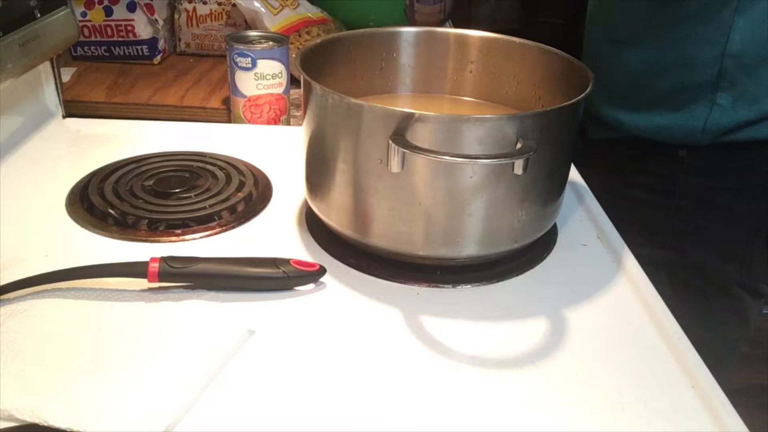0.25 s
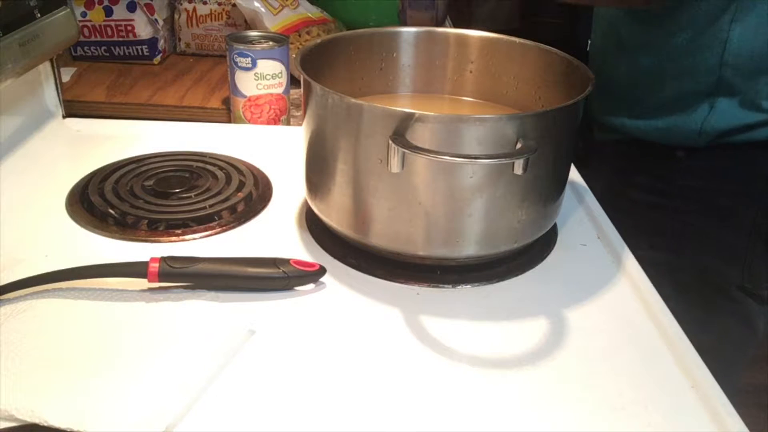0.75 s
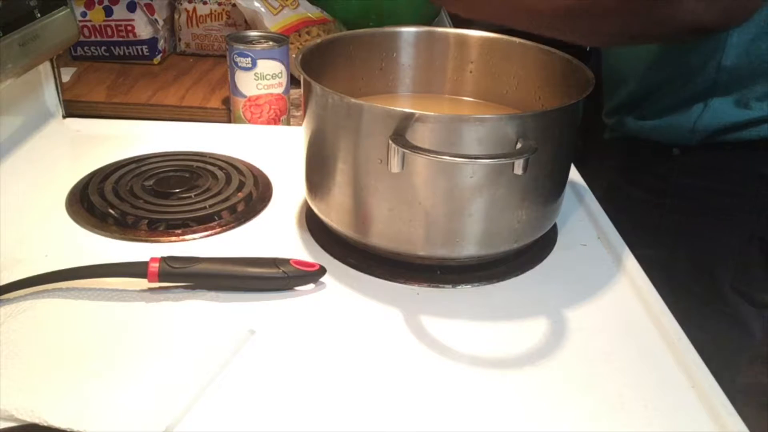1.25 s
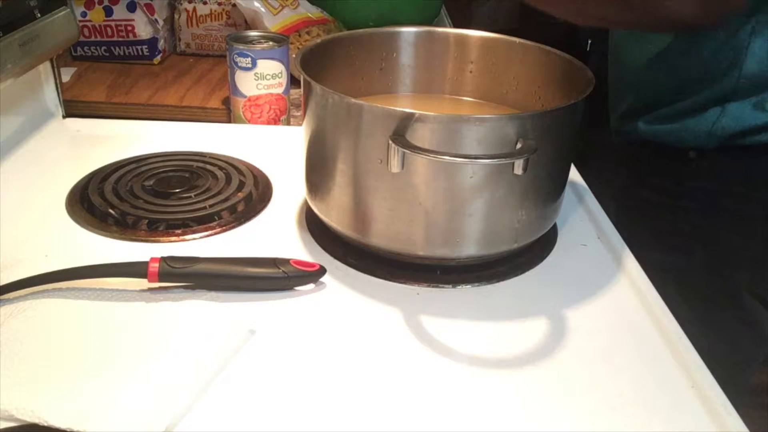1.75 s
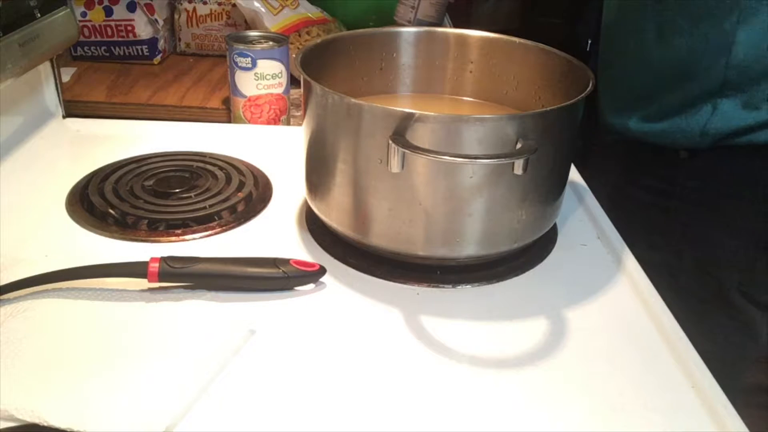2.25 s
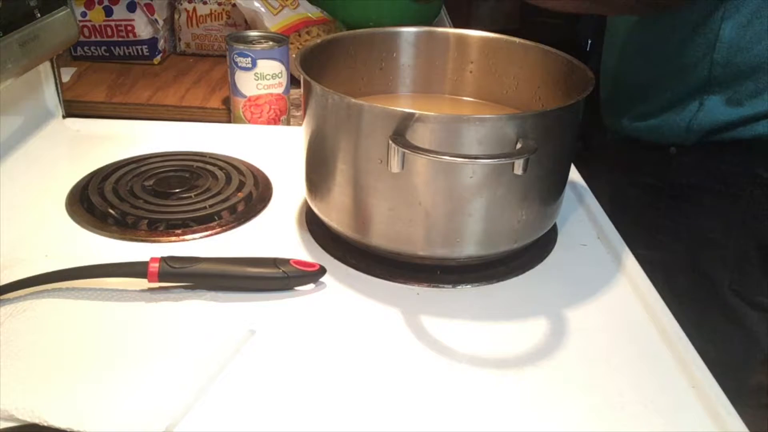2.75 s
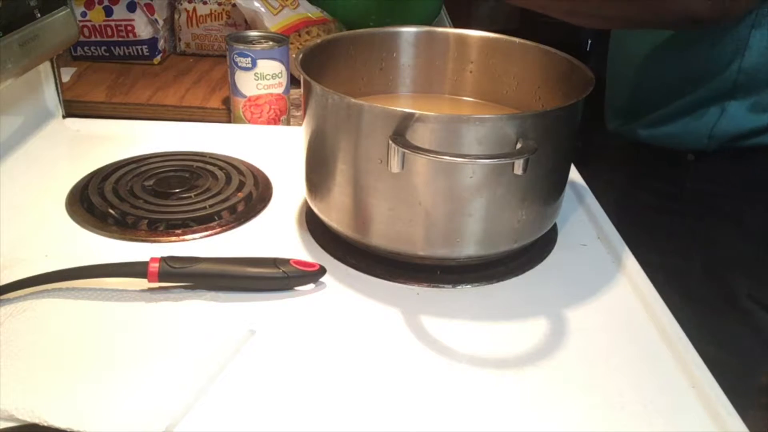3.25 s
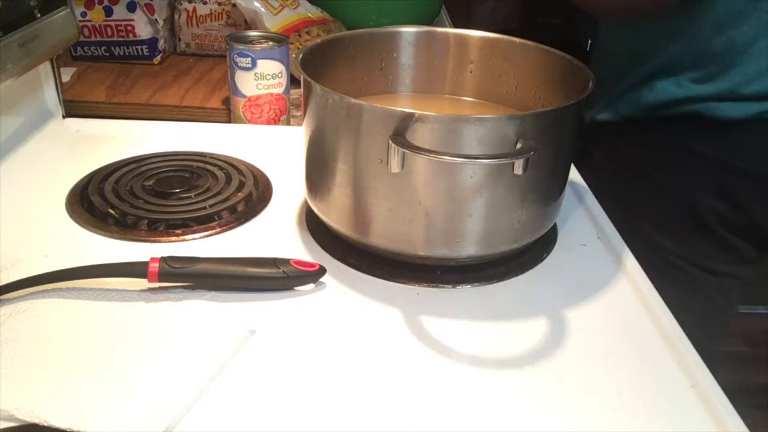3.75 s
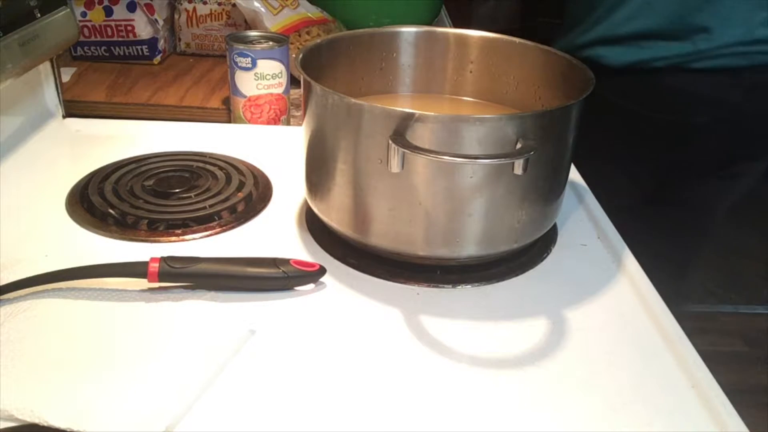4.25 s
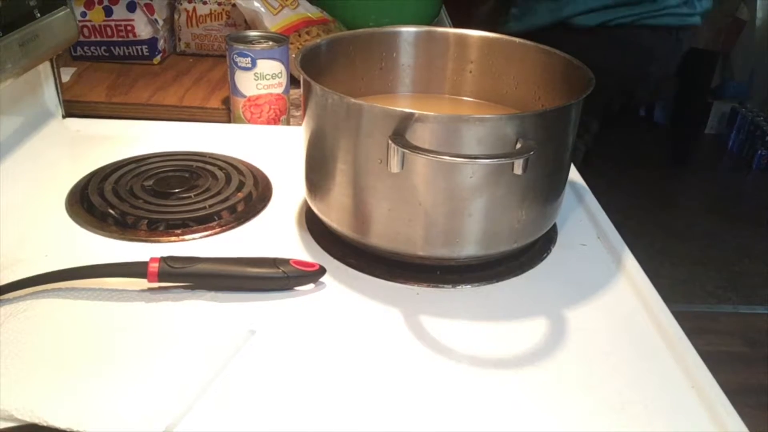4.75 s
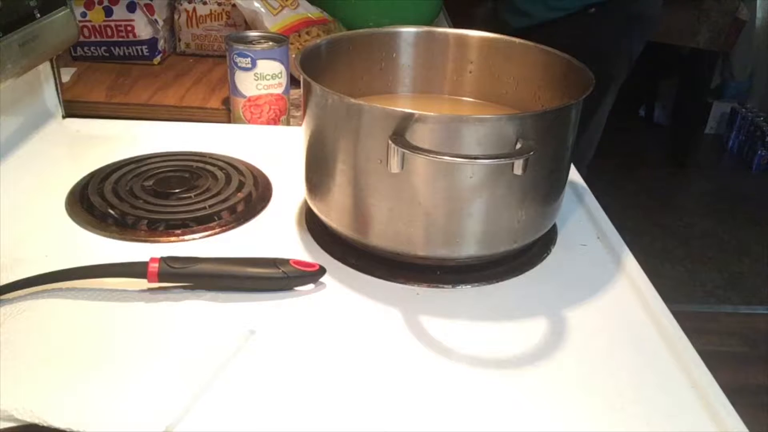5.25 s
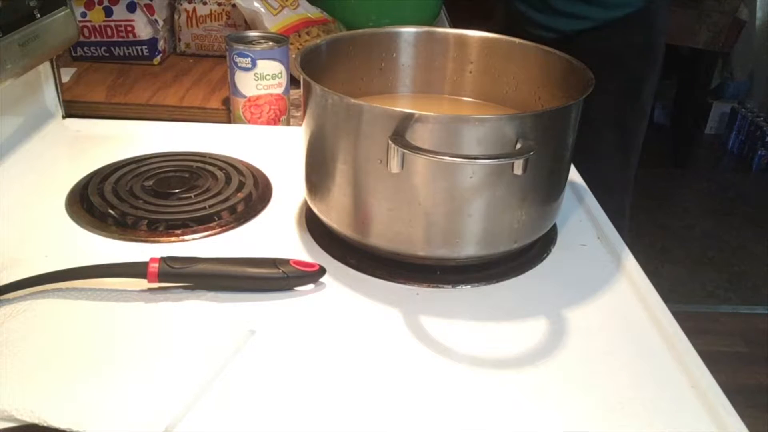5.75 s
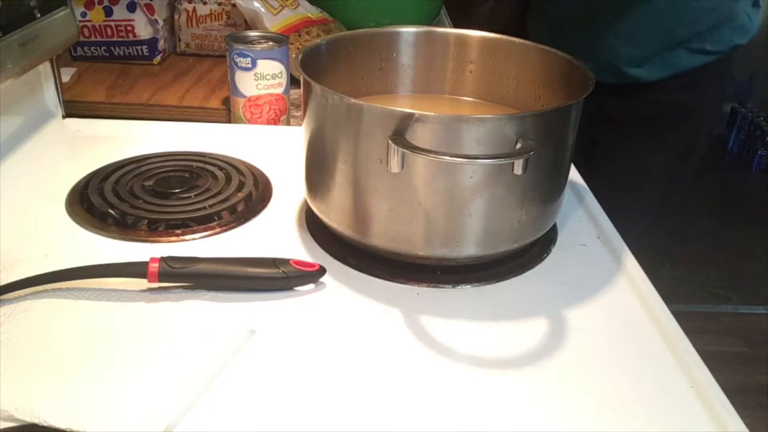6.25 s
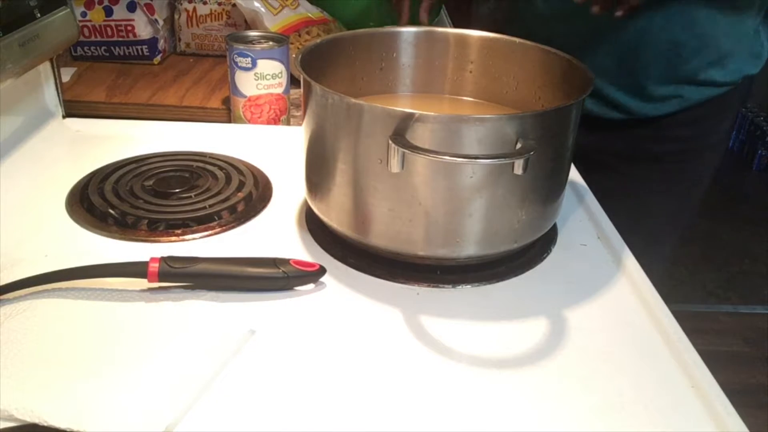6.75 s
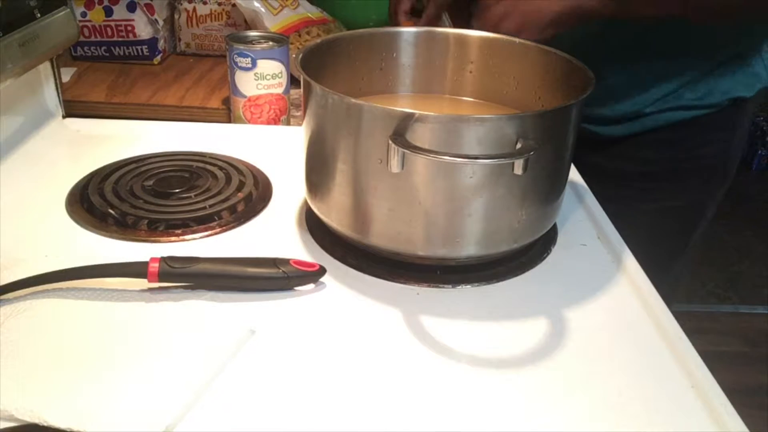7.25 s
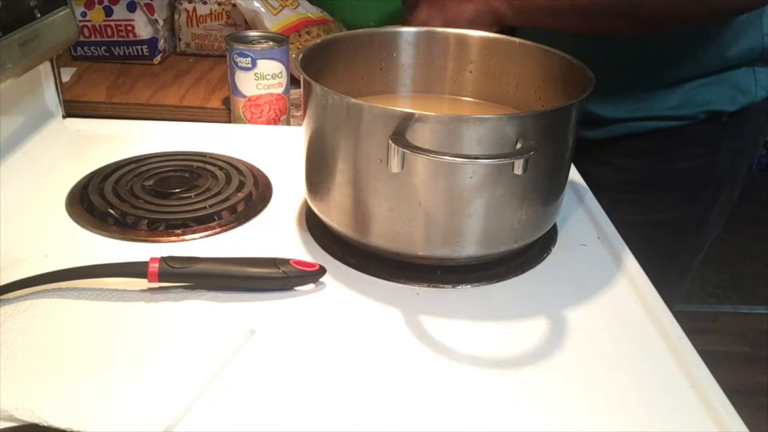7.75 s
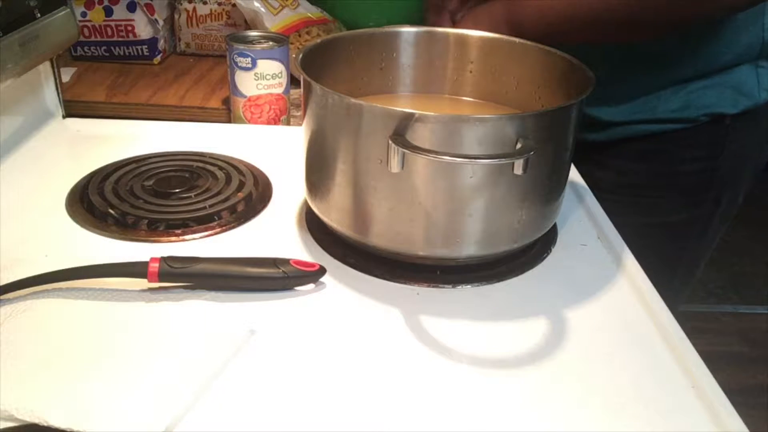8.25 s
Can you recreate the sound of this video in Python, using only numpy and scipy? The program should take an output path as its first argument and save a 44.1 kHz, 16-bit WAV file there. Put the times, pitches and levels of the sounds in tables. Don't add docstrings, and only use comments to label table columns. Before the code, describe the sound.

Quiet home kitchen with low room tone, faint refrigerator hum and tiny ticks from a warming stove. A can's rim snaps softly, then an opener thuds and clacks onto the counter. The loose lid drops with a bright ring and wobbles flat. A bin lid knocks, feet scuff, and the can crashes into the bin, rattling. Soft steps and a faint jingle follow. Single microphone near the stove, slight hard-walled reverberation.

```python
import sys
import numpy as np
from scipy import signal
from scipy.fft import rfft, irfft, next_fast_len
from scipy.io import wavfile
from scipy.ndimage import uniform_filter1d, map_coordinates

SR = 44100
rng = np.random.default_rng(int(sys.argv[2]) if len(sys.argv) > 2 else 0)


def wrap_up_sound(samples):
    columns = np.atleast_2d(samples).T
    tamed = np.clip(columns, -1, 1)
    steps = np.round(tamed * 32767).astype(np.int16)
    wavfile.write(sys.argv[1], SR, steps)


def undo_db(level):
    steps = np.asarray(level, float) / 20
    return 10 ** steps


N = 374850


def unit(x):
    return x / np.sqrt(np.mean(x ** 2) + 1e-20)


def along(points, hz):
    f, value = np.transpose(points)
    return np.interp(np.log(hz + 1), np.log(f + 1), value)


def wobble(rate):
    knots = rng.standard_normal(int(N * rate / SR) + 4)
    return map_coordinates(knots, [np.arange(N) * rate / SR])


def noise(tone, size, tilt_db=0):
    hz = np.fft.rfftfreq(size, 1 / SR)
    gain = undo_db(along(tone, hz) + tilt_db * np.log2(hz / 1000 + 0.26))
    return unit(irfft(rfft(rng.standard_normal(size)) * gain, size))


def fading(x, t60, patchy_db=0):
    hz, t, z = signal.stft(x, SR, nperseg=256)
    patches = unit(uniform_filter1d(rng.standard_normal(z.shape), size=8, axis=1))
    gain = undo_db(patchy_db * patches - 60 * t / t60(hz)[:, None])
    return signal.istft(z * gain, SR, nperseg=256)[1][:len(x)]


def swell(s, hold, db, rise_db_per_s, fall_db_per_s):
    t = np.arange(N) / SR - s
    return undo_db(db - rise_db_per_s * np.maximum(-t, 0) - fall_db_per_s * np.maximum(t - hold, 0))


def contacts(rows, own, **shared):
    full = []
    for row in rows:
        columns = dict(zip(["s", "peak_db"] + own.split(), row))
        full.append({"treble_db": 0, "free": 1, **shared, **columns})
    return [[c[key] for key in "s peak_db treble_db ring_db life free".split()] for c in full]


def phase_walk(count, size):
    walk = np.cumsum(rng.standard_normal((count, size // 64)), axis=1).repeat(64, axis=1)
    return uniform_filter1d(walk, size=128, axis=1)


def strike(hits, modes, tone, rise, rough, scatter_db=4.5, tilt=0.55, treble_loss=0.097, patchy_db=4, order=14):
    out, t = np.zeros(N + SR), np.arange(2 ** order) / SR
    hz, level_db, t60 = np.transpose(modes)[:, :, None]
    usual_db = np.mean(np.transpose(hits)[2])
    start = rng.uniform(0, 2 * np.pi, hz.shape)
    for s, peak_db, treble_db, ring_db, life, free in hits:
        tilt_db = tilt * (treble_db - usual_db)
        crack = fading(noise(tone, len(t), tilt_db), lambda f: life * (f / 1000 + 0.11) ** -treble_loss, patchy_db)
        rebounds = rng.standard_normal(len(t) // 128).repeat(128)
        crack *= undo_db(1.24 * uniform_filter1d(rebounds, size=128))
        size_db = level_db + tilt_db * np.log2(hz / 1000 + 0.15) + scatter_db * rng.standard_normal(hz.shape)
        shake = phase_walk(len(modes), len(t))
        phase = 2 * np.pi * hz * (t + round(s * SR) / SR) + start + rough * shake * np.sqrt(hz / 1000)
        decay = np.exp(-np.log(1000) * t / (free * t60))
        ring = np.sum(undo_db(size_db) * decay * np.sin(phase), axis=0)
        onset = (1 - np.exp(-(t / rise) ** 2)) * np.cos(np.pi / 2 * (t / t[-1]) ** 2)
        out[round(s * SR):][:len(t)] += undo_db(peak_db - 9.5) * onset * (crack + undo_db(ring_db) * ring)
    return out[:N]


# (frequency [Hz], density [dB per Hz])
ROOM_TONE = [(20, -19.5), (42, 2), (113, -9), (284, -17.5), (586, -21.5), (1150, -21.5), (1890, -26.5),
             (15800, -40.5)]
# (frequency [Hz], level [dB])
FRIDGE_TONES = [(839.8, -86), (1125, -80), (1244, -85.5)]


def air():
    t = np.arange(N) / SR
    hum = 0
    for hz, db in FRIDGE_TONES:
        level = undo_db(db + 4.0 + 3.1 * wobble(11.0))
        hum = hum + level * np.sin(2 * np.pi * hz * t + 0.39 * wobble(58))
    return undo_db(-62 + 0.25 * wobble(8.3)) * noise(ROOM_TONE, N) + hum


# (time [s], hold [s], level [dB])
FOOTSTEPS = [(0.068, 0.17, -59.5), (0.58, 0.0068, -45.5), (3.563, 0.0089, -42), (4.035, 0.14, -62.5),
             (4.429, 0.077, -42), (4.637, 0.019, -38), (5, 0.02, -52.5), (5.104, 0.11, -55.5),
             (5.272, 0.024, -59.5), (5.775, 0.044, -35), (5.91, 0.16, -41), (6.565, 0.03, -50.5),
             (6.847, 0.24, -58), (7.167, 0.068, -46), (7.4, 0.1, -63), (7.599, 0.11, -59),
             (7.985, 0.43, -65)]
# (time [s], peak level [dB])
HEEL_LANDINGS = [
    (4.635, -16),
    (5.097, -30.5),
    (6.553, -33.5),
    (6.572, -28),
    (6.596, -28.5),
    (7.141, -27),
    (7.165, -20),
    (7.205, -25),
    (7.232, -31.5),
]
# (time [s], hold [s], hiss level [dB], drag above the hiss [dB])
SOLE_SLIDES = [(4.366, 0.056, -60.5, 10.5), (4.506, 0.13, -57, 3.5), (3.475, 0.11, -72, 11.5),
               (4.995, 0.015, -65.5, -3.5), (5.037, 0.022, -64.5, 2), (5.28, 0.018, -64, 5.5),
               (6.563, 0.025, -63, 2.5), (6.598, .02, -65.5, 4), (6.636, 0.039, -62.5, -2),
               (6.811, 0.039, -71, 14.5), (6.894, 0.046, -68, 6), (7.158, 0.039, -59.5, 3)]
# (frequency [Hz], density [dB per Hz])
FLOOR_BOOM = [(25, -34.5), (50, -2.5), (90, -7), (125, 6), (160, -3), (250, -15), (350, -54.5)]
SOLE_HISS = [(1180, -27), (2000, -4.5), (4790, -6.5), (5360, -6.5), (11500, -13.5), (15800, -22)]
SOLE_DRAG = [(150, -39.5), (250, -8.5), (618, -12), (706, -9), (2430, -13.5), (3500, -17.5), (4550, -41.5),
             (7700, -120)]


def feet():
    lumps = undo_db(2 * wobble(25))
    weight = undo_db(-71)
    for step in FOOTSTEPS:
        weight = weight + swell(*step, rise_db_per_s=601.5, fall_db_per_s=218.5)
    boom = weight * unit(lumps * noise(FLOOR_BOOM, N))
    landings = contacts(HEEL_LANDINGS, "", ring_db=9, life=0.1)
    heels = strike(landings, [(122, -8, 0.15)], FLOOR_BOOM, rise=0.0051, rough=0.2, scatter_db=1)
    grit = undo_db(0.86 * wobble(300) + 1.9 * wobble(40))
    hiss = unit(grit * noise(SOLE_HISS, N))
    drag = unit(grit * noise(SOLE_DRAG, N))
    slides = 0
    for s, hold, db, drag_db in SOLE_SLIDES:
        slide = swell(s, hold, db, rise_db_per_s=417, fall_db_per_s=115.5)
        slides = slides + slide * (hiss + undo_db(drag_db) * drag)
    return boom + heels + slides


# (time [s], peak level [dB])
PLAIN_SLIPS = [(0.2374, -50), (0.403, -48), (1.8633, -46.5), (1.9525, -53.5), (2.1279, -46.5),
               (2.2618, -49), (2.7206, -43), (3.0957, -45.5), (7.452, -51), (7.7228, -54.5), (7.8915, -56),
               (8.0584, -54)]
DULL_SLIPS = [
    (0.0687, -48.5),
    (0.5522, -47.5),
    (0.821, -49.5),
    (3.4655, -57.5),
    (6.754, -44),
]
SHARP_SLIPS = [
    (2.167, -52),
    (2.025, -65),
    (4.5121, -41),
    (5.298, -49),
    (5.3304, -52),
    (6.4985, -47),
    (6.7134, -51),
    (7.291, -54),
    (8.4023, -52.5),
]
# (frequency [Hz], level [dB], t60 [s])
STOVE_MODES = [(1032, -1, 0.065), (1575, -5, 0.065), (2036, -5, 0.054), (2370, -2.5, 0.05),
               (2450, -2, 0.091), (2590, -3.5, 0.06), (2690, -3, 0.024), (3310, -12.5, 0.13),
               (4600, -22, 0.028)]
# (frequency [Hz], density [dB per Hz])
TICK_COLOUR = [(350, -13), (600, -3.5), (1830, -8.5), (2500, -6.5), (3770, -14), (6580, -16.5),
               (15500, -23)]


def stove():
    hits = []
    for rows, treble_db in [(PLAIN_SLIPS, -18), (DULL_SLIPS, -38), (SHARP_SLIPS, 3)]:
        hits += contacts(rows, "", treble_db=treble_db, ring_db=2.0, life=0.093, free=1.0)
    return strike(hits, STOVE_MODES, TICK_COLOUR, rise=0.0016, rough=0.3, scatter_db=1, tilt=0.066,
                  patchy_db=3.5, order=12)


# (time [s], peak level [dB], treble [dB])
SOFT_BUMPS = [
    (0.169, -46, -32),
    (0.6, -51, -29),
    (1.374, -50, -15),
    (5.075, -42, -12),
    (7.2, -38, -26.5),
    (7.68, -55, -20),
]
# (frequency [Hz], level [dB], t60 [s])
CUPBOARD_MODES = [(128, -5, 0.3), (366, -3, 0.25), (531, 0.5, 0.11), (628, 13.5, 0.049), (895, 4.5, 0.09),
                  (1257, -10.5, 0.12)]
# (frequency [Hz], density [dB per Hz])
CUPBOARD_COLOUR = [(60, -30), (130, -1), (250, 3), (600, 0.5), (1200, -1), (2200, -13), (5000, -28),
                   (15800, -68)]


def bumps():
    hits = contacts(SOFT_BUMPS, "treble_db", ring_db=-8, life=0.14)
    return undo_db(5.0) * strike(hits, CUPBOARD_MODES, CUPBOARD_COLOUR, rise=0.014, rough=0.3, scatter_db=2.5,
                             treble_loss=0.4)


# (time [s], peak level [dB])
RIM_SNAP = [
    (1.438, -27.5),
]
# (time [s], peak level [dB], ring time factor [1])
LID_PINGS = [
    (.445, -52, 0.85),
    (1.55, -39.5, 0.53),
    (2.166, -42, 0.93),
    (3.695, -33, 3.5),
    (3.79, -43.5, 2.5),
    (3.87, -54.5, 1.8),
]
# (frequency [Hz], level [dB], t60 [s])
RIM_MODES = [(276, -8.5, 0.18), (759, 0, 0.31), (592, 1.5, 0.27), (1140, 3.5, 0.23), (1526, -0.5, 0.19),
             (2020, 3, 0.16), (2460, 8, 0.11), (3560, 4, 0.079), (5150, -2, 0.12), (6800, -10, 0.11),
             (8250, -16, .08)]
# (frequency [Hz], density [dB per Hz])
SNAP_COLOUR = [(120, -44), (200, -12), (1120, -0.5), (1360, -11), (2040, -3), (2400, -7.5), (8330, -2.5),
               (15800, -11)]
LID_COLOUR = [(360, -42.5), (430, -18), (600, -7.5), (800, -30), (1300, -11.5), (2200, -18.5), (9000, -34),
              (15800, -38.5)]


def opening():
    breaking = contacts(RIM_SNAP, "", ring_db=-13, life=0.15)
    snap = strike(breaking, RIM_MODES, SNAP_COLOUR, rise=0.00072, rough=0.3, scatter_db=1.5)
    pings = contacts(LID_PINGS, "free", ring_db=16.5, life=0.05)
    return snap + undo_db(-14.5) * strike(pings, [(441, 0, 0.38)], LID_COLOUR, rise=0.0041, rough=0.045, scatter_db=0.5)


# (time [s], peak level [dB], t60 [s], frequency [Hz], beat
# [Hz])
TWIN_MODES = [(1.495, -64, .2, 3350, 12), (3.785, -46.5, .3, 6067, 6), (3.786, -51, .15, 7000, 20),
              (3.901, -42, .07, 11270, 30), (3.904, -43, .12, 8974, 25), (3.905, -49.5, .25, 6944, 25),
              (3.906, -41, 0.24, 6105, 9), (3.907, -44.5, .2, 7817, 17), (3.908, -44.5, .35, 8511, 14.4),
              (3.945, -59, .15, 13350, 25), (3.96, -56, .1, 11700, 15), (4.044, -41, .3, 3300, 22),
              (4.05, -30, .2, 1292, 30), (4.055, -37.5, .2, 4650, 22), (4.068, -33, .25, 1760, 12),
              (4.196, -22.5, 0.498, 1292, 4), (4.233, -29.5, .3, 1321, 2.2), (4.33, -37, .3, 1728, 24),
              (4.33, -34.5, 0.54, 1292, 3.4), (5.993, -39, 0.32, 5760, 18), (5.996, -33, 0.37, 1260, 28),
              (6.0, -40, 0.28, 6772, 19), (6.02, -46, .28, 4667, 19), (6.025, -39, .38, 3623, 13.5),
              (6.088, -33, .4, 1863, 11.2), (6.15, -43, 0.32, 666, 13.7)]


def beating():
    out, t = np.zeros(N + SR), np.arange(2 ** 14) / SR
    for s, db, t60, hz, beat_hz in TWIN_MODES:
        shake = phase_walk(2, len(t))
        phase = 2 * np.pi * np.outer([hz, hz + beat_hz], t) + 0.012 * hz / 1000 * shake
        onset = (1 - np.exp(-t / 0.003)) * np.cos(np.pi / 2 * (t / t[-1]) ** 4)
        twins = np.sin(phase[0]) + 0.63 * np.sin(phase[1])
        out[round(s * SR):][:len(t)] += undo_db(db - 60 * t / t60) * onset * twins
    return out[:N]


# (time [s], peak level [dB], crack t60 [s])
COUNTER_THUDS = [
    (3.552, -24.5, 0.069),
    (3.559, -26, 0.13),
    (3.572, -32.5, 0.1),
    (3.59, -31, 0.059),
    (3.612, -40.5, 0.07),
]
# (frequency [Hz], density [dB per Hz])
THUD_COLOUR = [(60, -30.5), (130, -5), (300, -6), (700, 0), (1300, -5), (2200, -17.5), (4000, -27),
               (15800, -51)]


def thud():
    hits = contacts(COUNTER_THUDS, "life", ring_db=-15.5)
    return undo_db(3.0) * strike(hits, CUPBOARD_MODES, THUD_COLOUR, rise=0.0012, rough=0.35, treble_loss=0.22, order=13)


# (time [s], peak level [dB], t60 [s], frequency [Hz])
SINGLE_RINGS = [(3.6885, -28, 0.043, 2560), (3.783, -19, 0.046, 2480), (3.808, -32.5, 0.14, 1860),
                (3.904, -33.5, .08, 1860), (3.968, -42.5, .3, 1860), (4.034, -28.5, 0.057, 5450),
                (4.196, -24.5, 0.043, 5520), (4.198, -39, 0.1, 1292), (4.285, -17, 0.13, 600),
                (4.283, -32, .15, 860), (4.305, -31.5, 0.36, 2015), (5.765, -25, 0.21, 1990),
                (5.773, -22.5, 0.041, 5300), (5.807, -30, 0.07, 2450), (5.967, -22, 0.079, 2450),
                (5.995, -14.5, 0.052, 2450), (5.998, -31, 0.15, 1260), (6.026, -20, 0.19, 1884),
                (6.086, -31, 0.19, 1860), (6.034, -23.5, 0.17, 436), (5.79, -56, 0.45, 6083),
                (5.9, -55, .5, 6083)]
# (frequency [Hz], density [dB per Hz])
CAN_COLOUR = [(250, -16.5), (436, 0), (759, -2), (1490, -10.5), (1900, -1), (2300, -17), (7620, -20),
              (15800, -37.5)]


def lone_rings():
    rings = 0
    for s, db, t60, hz in SINGLE_RINGS:
        hits = contacts([(s, db - 19)], "", ring_db=26, life=0.05)
        rings = rings + strike(hits, [(hz, 0, t60)], CAN_COLOUR, rise=0.0043, rough=0.11, scatter_db=-1.5)
    return rings


# (time [s], peak level [dB], crack t60 [s])
STEEL_GRAZES = [
    (3.689, -27.5, .03),
    (3.705, -33, .12),
    (3.7818, -31, .02),
    (3.826, -51, .02),
    (4.2, -48, .025),
    (3.946, -50, .02),
]
# (frequency [Hz], density [dB per Hz])
GRAZE_COLOUR = [(1500, -30), (5000, -7), (9000, -1.5), (13000, 1.5), (15800, -5)]


def grazes():
    hits = contacts(STEEL_GRAZES, "life", ring_db=-35.5)
    return strike(hits, [(11270, 0, 0.05)], GRAZE_COLOUR, rise=0.0004, rough=0.2, order=12)


# (time [s], peak level [dB], treble [dB], crack t60 [s])
OPENER_CONTACTS = [
    (3.689, -17.5, -11.5, 0.043),
    (3.7164, -25, -19.5, 0.083),
    (3.7815, -28.5, -19.5, 0.13),
    (3.6955, -26, -12.5, 0.036),
    (3.7994, -29.5, -21.5, 0.049),
    (3.832, -37.5, -19.5, 0.067),
]
# (time [s], peak level [dB], treble [dB], ring time share left by the counter [1])
HANDLE_CONTACTS = [
    (3.7818, -29.5, 2, 0.41),
    (3.902, -25.5, 17, 0.58),
    (3.9626, -26.5, -12, 0.91),
]
# (frequency [Hz], level [dB], t60 [s])
OPENER_MODES = [(1270, -11, 0.24), (1610, -13, 0.11), (2284, -6, 0.08), (1900, -11.5, 0.1),
                (2390, -8, 0.06), (2560, -2.5, 0.087), (2740, -10.5, 0.049), (3420, -8.5, 0.066),
                (4230, -19.5, 0.15), (5720, -21.5, 0.087), (11070, -26, 0.08), (12800, -26, 0.087)]
HANDLE_MODES = [(1860, 5.5, 0.11), (1920, -4.5, 0.25), (3320, -10, 0.23), (4130, -13.5, 0.16),
                (5000, -5, 0.1), (6083, -14, 0.12), (7440, -12.5, 0.18), (7900, -6.5, 0.087),
                (8250, -11.5, 0.2)]
# (frequency [Hz], density [dB per Hz])
OPENER_COLOUR = [(180, -46.5), (300, -25), (432, -3), (2050, -5.5), (2510, -4), (4300, -14), (12900, -20.5),
                 (15800, -21.5)]


def opener():
    body_hits = contacts(OPENER_CONTACTS, "treble_db life", ring_db=0.0, free=0.9)
    body = strike(body_hits, OPENER_MODES, OPENER_COLOUR, rise=0.00022, rough=0.38, scatter_db=-1.0, order=13)
    handle_hits = contacts(HANDLE_CONTACTS, "treble_db free", ring_db=-5, life=0.14)
    handles = strike(handle_hits, HANDLE_MODES, OPENER_COLOUR, rise=0.004, rough=0.03, tilt=0.2, scatter_db=1)
    return body + handles


# (time [s], peak level [dB], treble [dB])
LID_FALL = [
    (4.034, -7.5, -13.5),
    (4.043, -12, -25),
    (4.064, -28.5, -21.5),
    (4.108, -31, -6.5),
]
# (time [s], peak level [dB], treble [dB], ring time share [1])
LID_CONTACTS = [
    (3.954, -35.5, -23, 1),
    (4.15, -48, -3, 0.71),
    (4.196, -9.5, -21.5, 0.78),
    (4.209, -25, -13, 0.14),
    (4.24, -23.5, -17.5, 0.7),
    (4.272, -22, -20, 0.35),
    (4.294, -17, -19.5, 0.18),
    (4.34, -28.5, -16.5, 0.94),
    (4.578, -37, -22, 0.54),
]
# (frequency [Hz], level [dB], t60 [s])
LID_FALL_MODES = [(421.5, 0, 0.36), (549, 7.5, 0.2), (608, -3.5, 0.302), (863, -20, 1), (1285, -12, 0.5),
                  (1770, -9, 0.35), (2014, -18.5, 0.4), (2134, 4, 0.1), (2416, -13.5, 0.41),
                  (4570, -20.5, 0.2), (6970, -18.5, 0.14)]
LID_MODES = [(436, -1.5, 0.35), (569.6, -1, 0.2), (600, -6.5, 0.44), (853, -21, 0.87), (1292, -10, 0.36),
             (1463, -22, .2), (1714, -9, 0.17), (2160, -22.5, 0.18)]


def lid():
    fall_hits = contacts(LID_FALL, "treble_db", ring_db=5.5, life=0.073, free=0.18)
    fall = strike(fall_hits, LID_FALL_MODES, LID_COLOUR, rise=0.0015, rough=0.06, scatter_db=0.96)
    ring_hits = contacts(LID_CONTACTS, "treble_db free", ring_db=8.5, life=0.045)
    ringing = strike(ring_hits, LID_MODES, LID_COLOUR, rise=0.0019, rough=0.041, scatter_db=1.6)
    thin = signal.butter(4, 370, "high", fs=SR, output="sos")
    return signal.sosfilt(thin, undo_db(-3.5) * fall + undo_db(-4.5) * ringing)


# (time [s], peak level [dB], treble [dB], ring time share [1])
SPIN_CONTACTS = [
    (4.1515, -28, -12.5, 0.24),
    (4.1944, -20.5, -10, 0.1),
    (4.2777, -35.5, -4, 0.36),
    (4.3146, -31, -8, 0.74),
    (4.3444, -28.5, -34.5, 1),
    (4.3794, -39, -12, 0.29),
]
# (frequency [Hz], level [dB], t60 [s])
SPIN_MODES = [(1705, -16, 0.3), (2011, 6, 0.37), (2441, 11.5, 0.11), (3070, -8.5, 0.47), (3600, -10, 0.4),
              (4118, -13, 0.25), (5830, 5.5, 0.036), (5950, -18, 0.23), (6770, -7, 0.14), (8500, -15, .15)]
# (frequency [Hz], density [dB per Hz])
SPIN_COLOUR = [(600, -51.5), (1200, -9), (2200, -6.5), (4000, -8.5), (8000, -15), (12000, -23),
               (15800, -25.5)]


def spinning_lid():
    hits = contacts(SPIN_CONTACTS, "treble_db free", ring_db=-1.2, life=0.28)
    return undo_db(-3.5) * strike(hits, SPIN_MODES, SPIN_COLOUR, rise=0.0016, rough=0.13, scatter_db=2)


# (time [s], peak level [dB], treble [dB], ring above the crack [dB])
PANEL_KNOCKS = [
    (4.615, -18, -26, -8),
    (4.632, -26, -27, -21.5),
    (6.549, -50.5, -12.5, -7),
    (6.802, -40.5, -33.5, -5),
    (7.14, -39.5, -29.5, -7.5),
]


def knocks():
    hits = contacts(PANEL_KNOCKS, "treble_db ring_db", life=0.13)
    return undo_db(2.0) * strike(hits, CUPBOARD_MODES, CUPBOARD_COLOUR, rise=0.0014, rough=0.25, scatter_db=2.5,
                             treble_loss=0.13)


# (time [s], peak level [dB], crack t60 [s])
CHATTER = [(5.729, -36.5, 0.045), (5.8984, -48, 0.087), (5.9234, -48, 0.092), (5.986, -17, 0.094),
           (5.9952, -35.5, 0.17), (6.01, -22.5, 0.21), (6.0296, -31, 0.15), (6.048, -35.5, .15),
           (6.0875, -38, 0.14), (6.115, -40.5, 0.16), (6.15, -42.5, 0.13), (6.2496, -49, .1)]
# (frequency [Hz], density [dB per Hz])
CHATTER_COLOUR = [(300, -28), (1000, 1), (2200, 1), (4000, -2.5), (6000, -4.5), (8000, -9), (11000, -17),
                  (15800, -15)]


def rattle():
    hits = contacts(CHATTER, "life", ring_db=-40.5)
    return undo_db(-1.0) * strike(hits, [(5760, 0, 0.11)], CHATTER_COLOUR, rise=0.003, rough=0.2, patchy_db=6, order=13)


# (time [s], peak level [dB], crack t60 [s])
BIN_CRASH = [
    (5.738, -5.5, 0.066),
    (5.752, -4.5, 0.16),
    (5.764, -3, 0.2),
    (5.78, -10.5, 0.036),
    (5.805, -11, 0.21),
    (5.813, -15.5, 0.073),
    (5.87, -22.5, 0.43),
    (5.898, -23.5, 0.49),
    (5.929, -19.5, 0.26),
    (5.964, -22.5, 0.087),
]
# (frequency [Hz], level [dB], t60 [s])
BIN_MODES = [(105.6, -4, 0.089), (134.6, -5.5, 0.063), (203.8, -4.5, 0.45), (234.6, 7, 0.12),
             (275.4, -1.5, 0.46), (407.3, -9, 0.43), (596, -15.5, 0.33), (964, -2, 0.07)]
# (frequency [Hz], density [dB per Hz])
BIN_COLOUR = [(29, -43.5), (50, -8), (223, -1), (481, -2), (1810, -14.5), (3000, -18), (5480, -28),
              (15800, -40)]


def crash():
    hits = contacts(BIN_CRASH, "life", ring_db=-15.0)
    return undo_db(-3.5) * strike(hits, BIN_MODES, BIN_COLOUR, rise=0.0029, rough=0.2, scatter_db=4.0, treble_loss=0.27)


# (time [s], peak level [dB], treble [dB], ring time share [1])
CAN_CONTACTS = [
    (5.7406, -25, -19, 0.33),
    (5.7627, -23.5, -10.5, 0.19),
    (5.8062, -28, -20, 0.85),
    (5.9234, -28.5, -23.5, 0.5),
    (5.9687, -22.5, -21, 0.34),
    (5.9945, -19, -15.5, 0.65),
    (6.0496, -26.5, -15.5, 0.47),
    (6.0972, -28, -18.5, 0.43),
    (6.1601, -39.5, -22.5, 0.33),
]
# (frequency [Hz], level [dB], t60 [s])
CAN_MODES = [(436, -6.5, 0.46), (656, -6.5, 0.31), (1240, -2.5, 0.2), (1717, -18.5, 0.37),
             (1860, -21, 0.25), (1977, -13.5, 0.27), (2145, -8.5, 0.16), (2456, 1, 0.11), (3560, -20, 0.32),
             (4667, -26.5, 0.3), (5690, -13.5, 0.15), (6560, -22, 0.19), (6772, -21.5, 0.3),
             (7560, -18, 0.17)]


def can():
    hits = contacts(CAN_CONTACTS, "treble_db free", ring_db=2.5, life=0.28)
    return undo_db(-1.5) * strike(hits, CAN_MODES, CAN_COLOUR, rise=0.0036, rough=0.2, scatter_db=6.0)


# (time [s], peak level [dB])
WALL_JOLTS = [(5.748, -14), (5.7533, -17), (5.7561, -7.5), (5.7591, -13.5), (5.7677, -9), (5.7704, -17),
              (5.776, -8), (5.782, -22.5), (5.787, -17.5), (5.7904, -16.5), (5.8052, -17), (5.8148, -11),
              (5.8219, -27.5), (5.8255, -28.5), (5.8337, -24), (5.842, -25.5)]
# (frequency [Hz], width [Hz], level [dB])
WALL_RESONANCES = [(148.7, 61, -4), (258, 120, 0.5), (669, 240, -16.5), (900, 130, 5), (1330, 270, -13)]


def jolts():
    size = next_fast_len(N + SR)
    f = np.fft.rfftfreq(size, 1 / SR)
    s, db = np.transpose(WALL_JOLTS)
    blows = np.bincount(np.round(s * SR).astype(int), undo_db(db), size)
    wall = 0
    for centre, width, gain_db in WALL_RESONANCES:
        wall = wall + undo_db(gain_db) * 1j * f * width / (centre * centre - f * f + 1j * f * width)
    push_s = 0.0011
    push = np.exp(-(np.pi * f * push_s) ** 2 / 4) * f / (f + 60) * push_s * SR
    return irfft(rfft(blows) * push * (0.7 + 0.9 * wall), size)[:N]


# (time [s], peak level [dB], treble [dB])
CHARM_JINGLES = [
    (7.015, -37.5, -4),
    (8.0, -46.5, 4),
]
# (frequency [Hz], level [dB], t60 [s])
CHARM_MODES = [(2920, -2, .2), (5260, 0, .2), (8050, -3, .15), (11300, -15, .1), (15100, -7, .12)]


def charm():
    hits = contacts(CHARM_JINGLES, "treble_db", ring_db=30, life=0.1, free=0.75)
    return undo_db(-30) * strike(hits, CHARM_MODES, TICK_COLOUR, rise=0.03, rough=0.02, scatter_db=0.5, tilt=0.3)


# (frequency [Hz], t60 [s])
KITCHEN_DECAY = [(100, 0.17), (500, 0.36), (2000, 0.5), (6000, 0.52), (15000, 0.097)]


def kitchen(x, wet_db):
    tail = fading(rng.standard_normal(2 ** 15), lambda f: along(KITCHEN_DECAY, f))
    late = np.pad(x, (300, 0))
    return x + undo_db(wet_db) * signal.fftconvolve(late, tail / np.linalg.norm(tail))[:N]


def scene():
    mix = air() + feet()
    mix = mix + kitchen(stove(), wet_db=-9.5)
    mix = mix + kitchen(opening(), wet_db=-15.5)
    mix = mix + kitchen(beating() + grazes(), wet_db=-11)
    mix = mix + kitchen(opener() + lid() + spinning_lid() + can(), wet_db=-5.5)
    blows = bumps() + thud() + lone_rings() + knocks() + rattle() + crash() + jolts()
    mix = mix + kitchen(blows, wet_db=-6.5)
    mix = mix + kitchen(charm(), wet_db=-5.5)
    return mix[None]


def roll_off(x):
    return signal.sosfilt(signal.butter(12, 16490, fs=SR, output="sos"), x)


# (frequency [Hz], gain [dB])
MICROPHONE_RESPONSE = [(15, -37.5), (45, -0.5), (5000, -3), (6200, -1), (9500, -1), (10500, -3.5),
                       (11500, 0), (15800, -5)]


def record(dry):
    hz = np.fft.rfftfreq(N, 1 / SR)
    response = undo_db(along(MICROPHONE_RESPONSE, hz)) * (hz < 15850)
    heard = irfft(rfft(dry) * response, N)
    return roll_off(heard)


dry = scene()
out = record(dry)
wrap_up_sound(out)
```